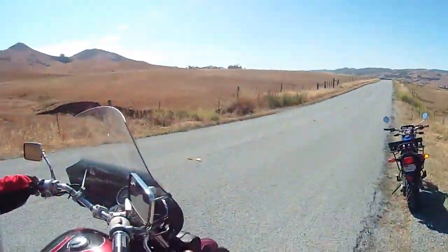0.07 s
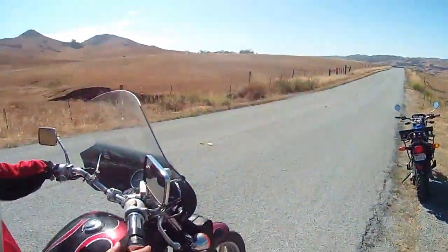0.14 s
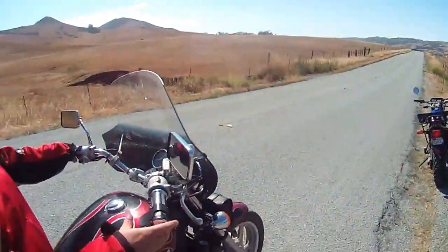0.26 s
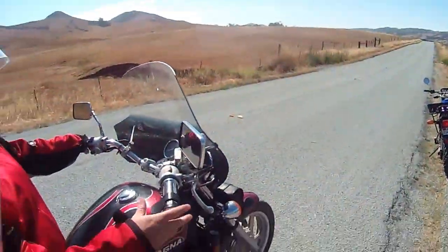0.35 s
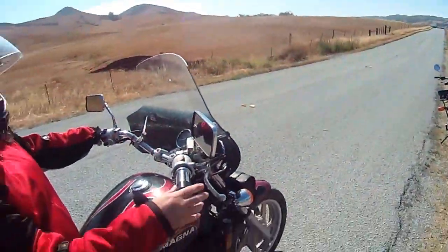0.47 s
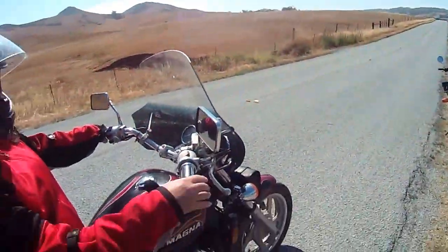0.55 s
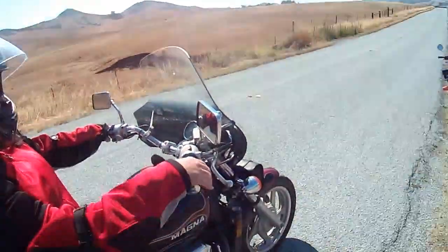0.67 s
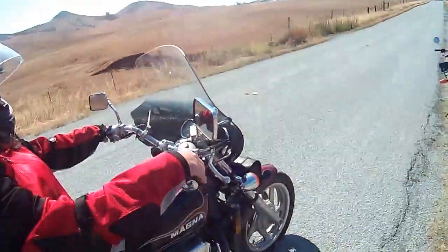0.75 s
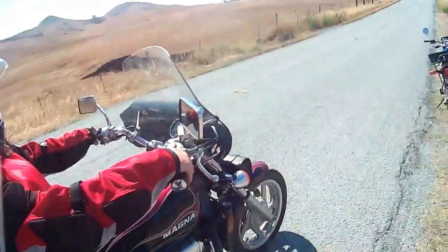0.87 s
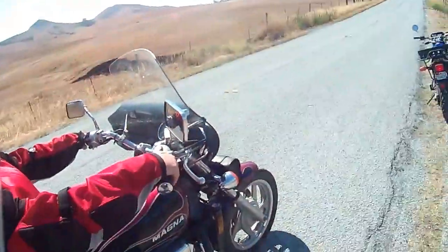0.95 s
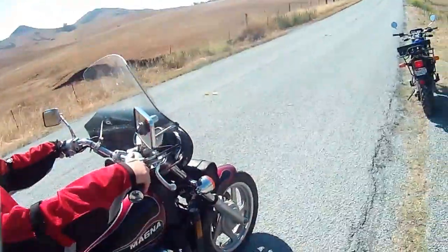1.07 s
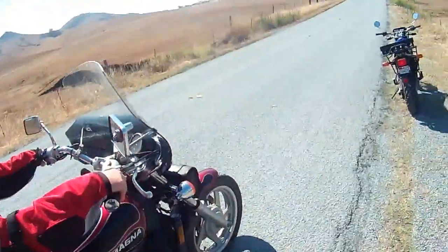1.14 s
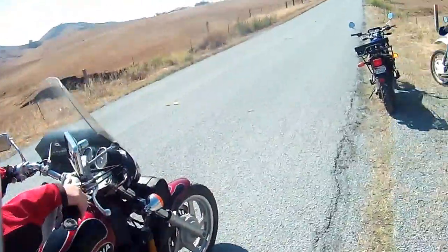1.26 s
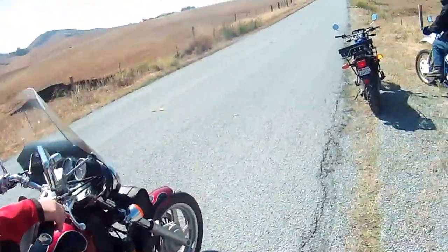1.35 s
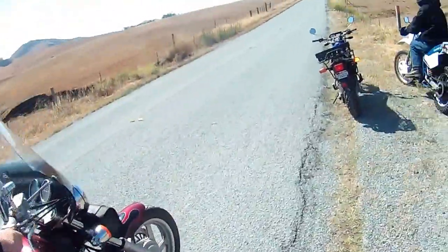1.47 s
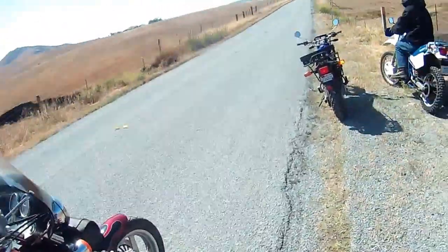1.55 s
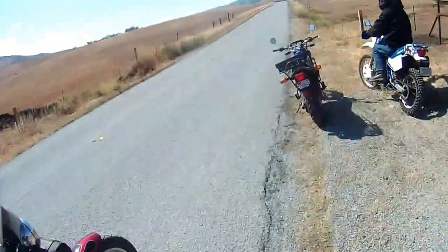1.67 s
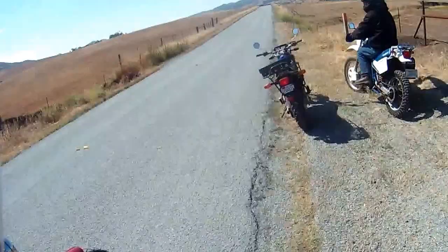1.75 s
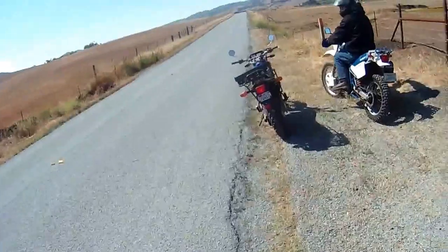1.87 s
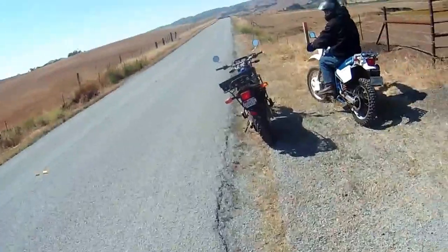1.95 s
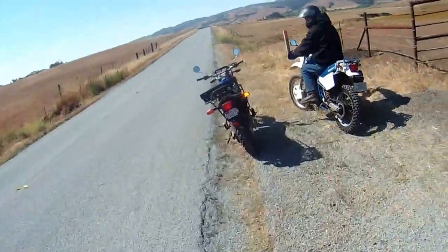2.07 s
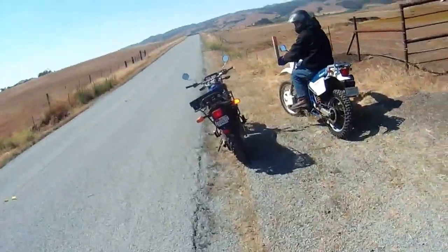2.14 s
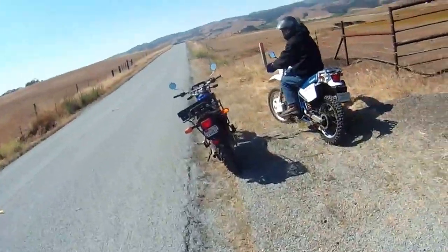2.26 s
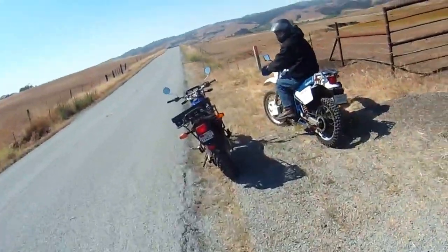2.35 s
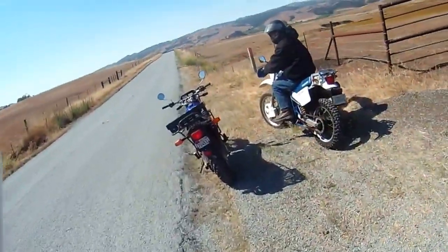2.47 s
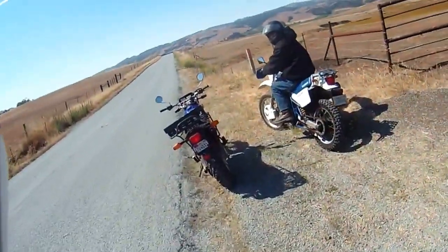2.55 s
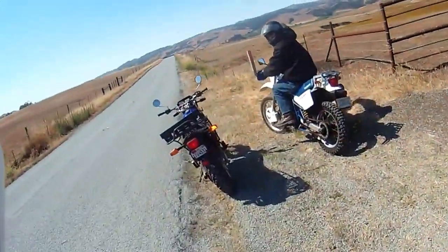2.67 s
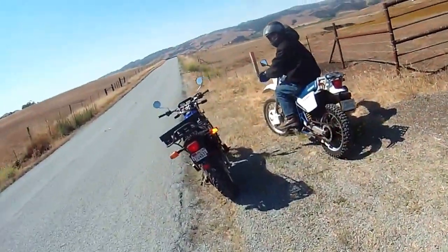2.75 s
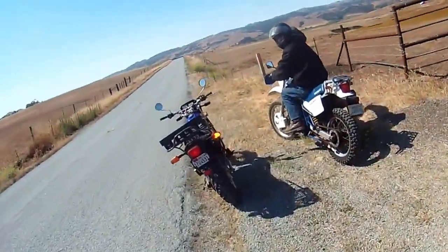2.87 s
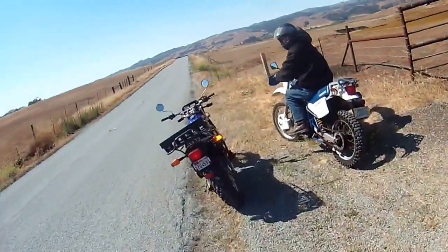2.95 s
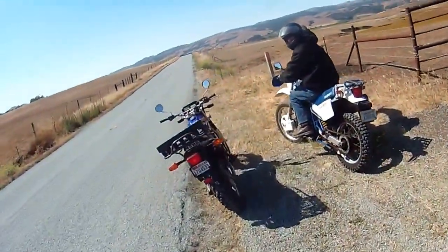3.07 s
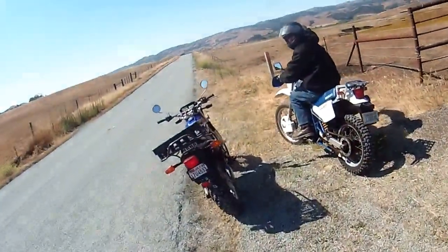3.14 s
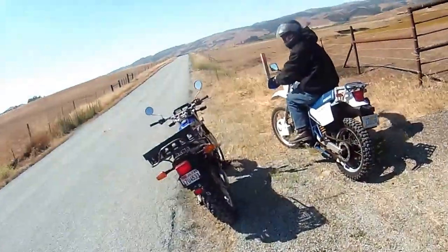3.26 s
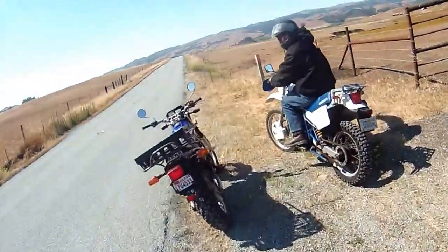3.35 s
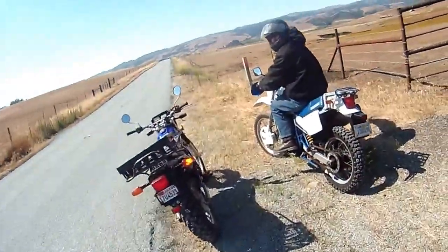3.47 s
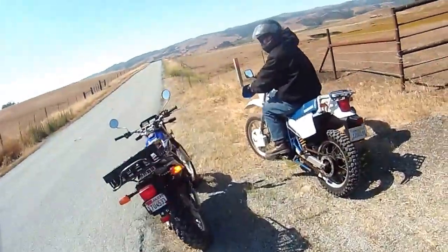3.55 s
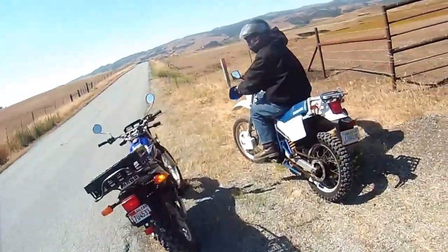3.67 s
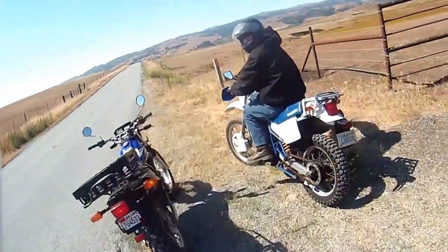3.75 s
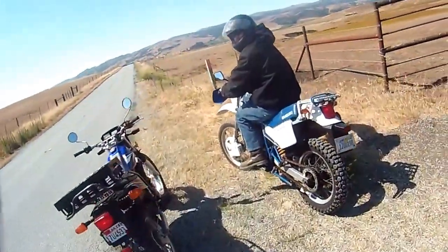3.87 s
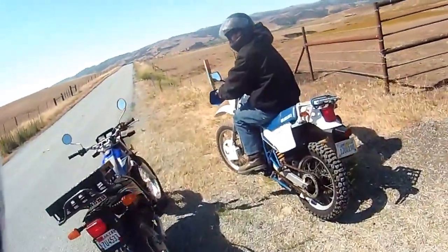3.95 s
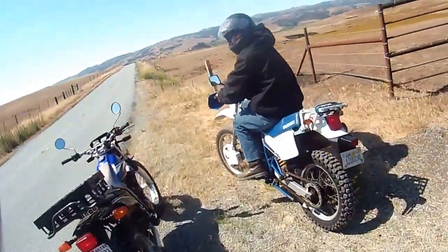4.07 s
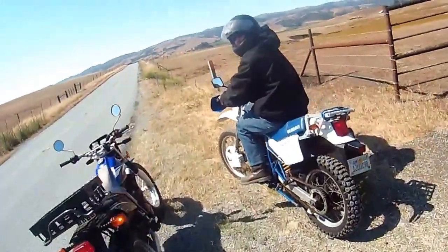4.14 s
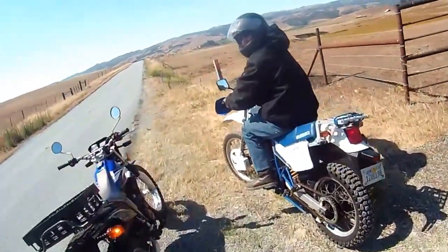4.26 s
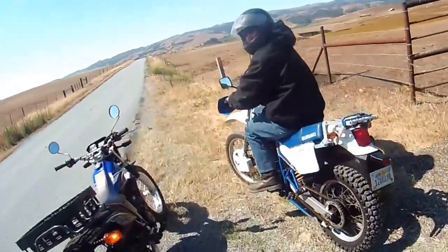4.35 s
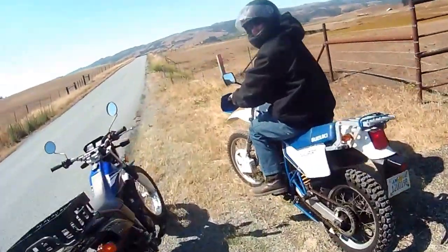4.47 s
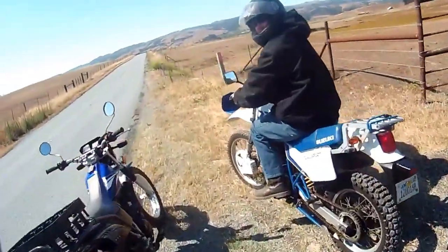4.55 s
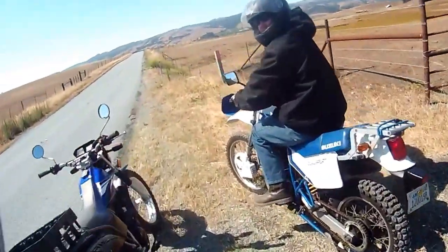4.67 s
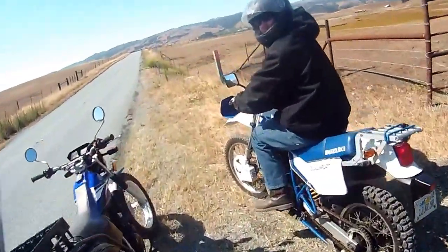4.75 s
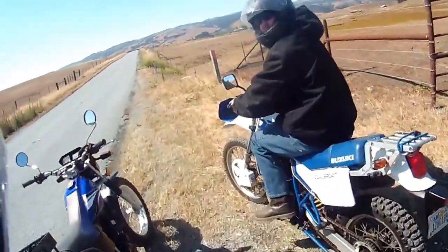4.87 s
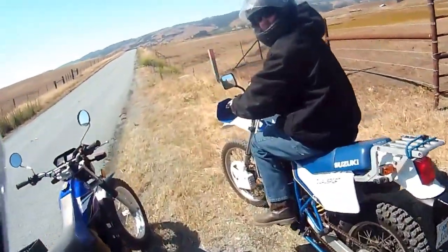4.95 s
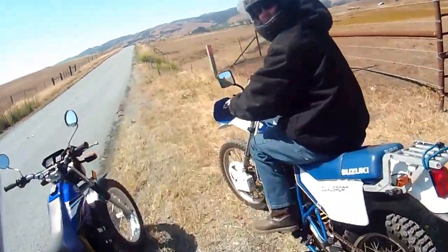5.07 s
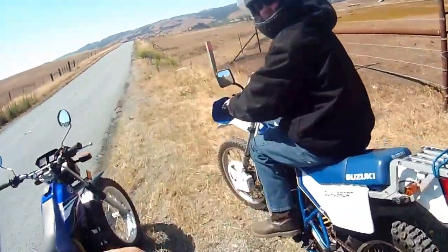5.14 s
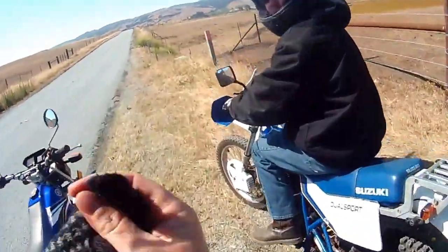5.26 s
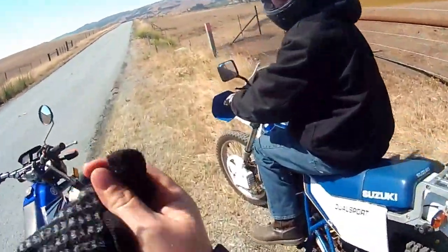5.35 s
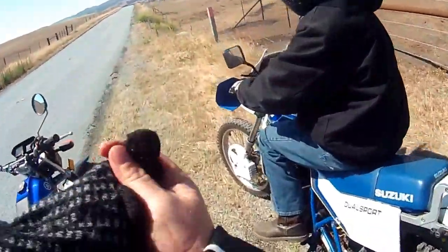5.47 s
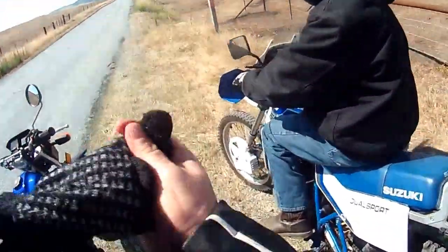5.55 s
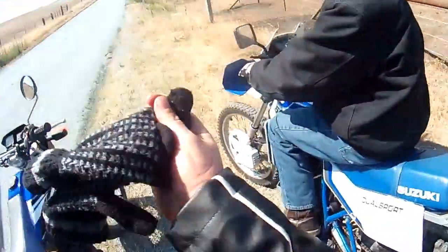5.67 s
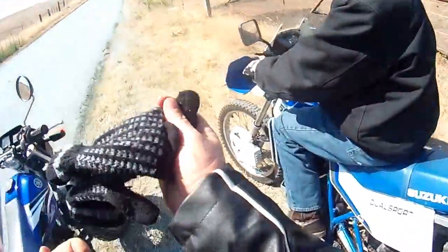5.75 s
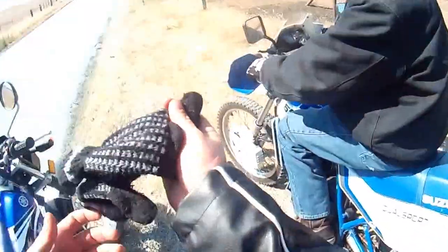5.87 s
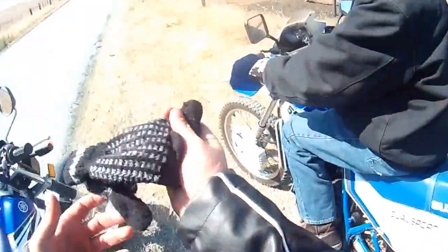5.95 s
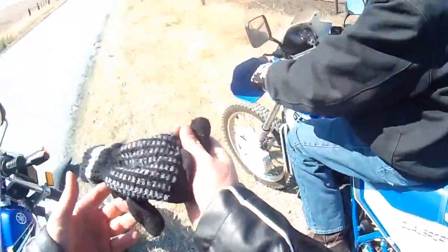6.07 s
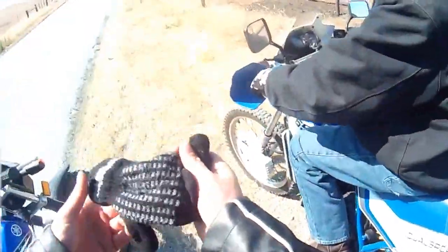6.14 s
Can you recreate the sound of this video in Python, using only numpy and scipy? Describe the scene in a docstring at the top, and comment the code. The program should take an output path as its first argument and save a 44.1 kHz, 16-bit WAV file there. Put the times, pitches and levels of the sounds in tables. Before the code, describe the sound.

A cruiser motorcycle rolls past close by with a small burst of throttle, its low drone and mechanical rasp slowing to an uneven chuffing idle that fades. Two single-cylinder bikes idle out of step at the roadside, one knocking and clattering, the other puffing and hissing, and grow louder as the hand-held microphone approaches. A boot scuffs gravel once, with a few soft microphone bumps and a light breeze in open country without echo.

```python
"""A V-four cruiser rolls past close by, gives a little throttle, then slows to a chuffing idle and fades.
Its uneven firings drone through the muffler while the valve gear rasps. Two singles idle out of step at
the roadside, louder as a hand-held camera nears: a dirt bike knocks and clatters, a slower trail bike
puffs and hisses. A boot scuffs the gravel, the camera takes a few soft bumps and a light breeze blows.
Open country: no reverberation."""
import sys
import numpy as np
from scipy import signal
from scipy.fft import rfft, irfft
from scipy.io import wavfile

SR = 44100
rng = np.random.default_rng(int(sys.argv[2]) if len(sys.argv) > 2 else 0)


def file_out(sig):
    """Save sig as 16-bit WAV at sys.argv[1]."""
    # one column per channel
    cols = np.atleast_2d(sig).T
    # limit, then scale
    lim = np.clip(cols, -1, 1)
    pcm = np.round(lim * 32767).astype(np.int16)
    wavfile.write(sys.argv[1], SR, pcm)


N = 273508
TIME = np.arange(N) / SR

# the cruiser's revs: (time [s], four-stroke cycle rate [Hz])
CRUISER_REVS = [(0, 18.3), (.09, 19.3), (.2, 21.8), (.3, 22.8), (.48, 21.2), (.82, 15.7), (1, 12.8),
                (1.3, 10.6), (6.2, 10.2)]
# the cruiser passes and stops behind the camera: (time [s], exhaust [dB], rasp [dB])
CRUISER_LEVELS = [(0, -55.5, -47), (.2, -52.5, -42.5), (.35, -55.5, -42.5), (.5, -53, -43.5),
                  (.75, -53, -47.5), (.92, -56.5, -49.5), (1.1, -55.5, -51), (1.55, -64.5, -63),
                  (2.1, -65.5, -68), (2.75, -66.5, -72), (3.6, -81.5, -76), (6.2, -78, -80)]
# the dirt bike's idle, hunting a little: (time [s], beat rate [Hz])
DIRT_IDLE = [(1.3, 18.02), (1.6, 17.39), (1.8, 17.91), (2.2, 17.48), (2.6, 17.835), (3.2, 17.655),
             (3.5, 18.19), (3.85, 17.59), (4.05, 18.74), (4.55, 18.75), (4.95, 18.395), (6.2, 18.86)]
# loud engine ticking as the cruiser passes, then the dirt bike growing as the camera nears:
# (time [s], ticking [dB], dirt bike boom [dB], dirt bike bark [dB])
ROADSIDE_LEVELS = [(0, -47.5, -76, -72), (1.5, -59.5, -66, -79.5), (2.45, -63.5, -65.5, -87),
                   (3.1, -59.5, -65.5, -78), (3.7, -56, -67.5, -70), (4.6, -54, -68.5, -65),
                   (5.15, -52.5, -66, -63.5), (5.65, -53.5, -67, -63), (6.2, -53.5, -66, -64.5)]
# the idling bikes' treble glances off the ground, by a shifting path: (time [s], lag [s])
IDLER_LAG = [(1.6, .00053), (2.2, .000485), (3.2, .000483), (4.3, .00042), (5.3, .0004)]
IDLER_ECHO = .33  # gain of that bounce
DIRT_ON_BEAT_S = 1.337


def cruiser_exhaust(boom_db=0.5, boom_hz=89, muffler_hz=250, cut_hz=62, roughness=.07, break_up=0.076,
                    chuff_db=-27.5, chuff_growth=1.8):
    """Four uneven firings a cycle drone through a muffler and break up into chuffs as the revs fall."""
    # a touch of throttle: (time [s], opening [0-1], bark of the upper orders [dB])
    throttle = [(0, 1, -29), (.2, 0.9, -28), (.29, 0.65, -15), (.345, 0.03, -17), (.45, 0, -39)]
    # the exhaust note: (order [multiple of the cycle rate], throttle open [dB], throttle shut [dB])
    orders = [(2, -10, -11), (3, -22, -19), (4, -1, 2.5), (5, -21, -20), (6, -8, 1), (7, -18, -11),
              (8, -4, 2), (9, -22, -8), (10, -0.5, -8), (11, -39, -7), (12, -3, -16), (13, -22, -9.5),
              (14, -6, -16), (16, -12, -11.5)]
    cycle_hz, turns, ragged = cruiser_crank()
    opening, bark_db = curves(throttle)
    exhaust_db, _ = curves(CRUISER_LEVELS)
    note, power = 0, 0
    for k, open_db, shut_db in orders:
        hz = k * cycle_hz
        db = shut_db + (open_db - shut_db) * opening + boom_db / (1 + ((hz - boom_hz) / 9) ** 2)
        height = amp(db) / np.sqrt((1 + (hz / muffler_hz) ** 10) * (1 + (cut_hz / hz) ** 6))
        wobble = 1 + roughness * ragged * drift(3.1)
        note += height * wobble * np.cos(2 * np.pi * (k * turns + rng.random()))
        power += height ** 2 / 2
    drone = note / np.sqrt(power) / (1 + break_up * (ragged - 1) ** 2)
    bark = unit(sum(np.cos(2 * np.pi * (k * turns + rng.random())) / k for k in (24, 28, 32, 36)))
    strokes = [(s, 1.1 * rng.standard_normal()) for s in TIME[np.flatnonzero(np.diff(np.floor(2 * turns)))]]
    # dark, throaty gas: (frequency [Hz], level [dB])
    gas_colour = [(25, -19), (80, -8.5), (130, 0), (190, 5.5), (290, -29.5), (550, -15.5), (900, -45.5)]
    gas = colour(rng.standard_normal(N), gas_colour)
    burble = unit(puffs(gas, strokes, rise_s=0.0067, fall_s=0.02, between=0.12, lead_s=0))
    chuffs = amp(chuff_db) * burble * ragged ** chuff_growth
    return amp(exhaust_db) * (drone + amp(bark_db) * bark + chuffs)


def cruiser_gears(throb=.3, case_db=-3, whirr_db=-44, pass_s=0.36, pass_width_s=0.061):
    """Valve gear rasps in step with the crank and rings the crankcase; the gearcase whirrs going by."""
    # the gritty rasp: (frequency [Hz], level [dB])
    rasp_colour = [(180, -45), (300, -38), (397, -35), (439, -26), (808, -27), (1260, -4), (1490, -14.5),
                   (1640, 5), (2650, -8), (3070, -7.5), (4000, -14.5), (4350, -16.5), (6570, -21.5),
                   (7620, -28), (15500, -49.5)]
    # crankcase and gearcase resonances: (frequency [Hz], width [Hz], level [dB])
    crankcase_modes = [(1230, 100, 4.5), (1641, 49, 15.5), (1626, 150, -9.5), (2030, 20, -11),
                       (2650, 11, 7), (2980, 6, -2.5), (4330, 106, -1.5), (4980, 20, -11.5), (6460, 48, -3),
                       (6450, 80, -15.5), (9030, 100, -18)]
    gearcase_modes = [(1834, 160, 0)]
    # the treble's bounce off the ground: (time [s], lag [s])
    ground_lag = [(0, .00044), (1, .00045), (1.7, .000475)]
    _, turns, ragged = cruiser_crank()
    _, rasp_db = curves(CRUISER_LEVELS)
    load = unit(1 + throb / np.sqrt(ragged) * np.cos(2 * np.pi * (2 * turns - .2)))
    ticks = grains(14000, .6) * load
    rasp = colour(ticks, rasp_colour) + amp(case_db) * highpass(ring(ticks, crankcase_modes), 1360)
    rasp = unit(over_ground(rasp, ground_lag, echo=0.23))
    whirr = unit(ring(ring(ticks, gearcase_modes), gearcase_modes))
    passing = np.exp(-((TIME - pass_s) / pass_width_s) ** 2)
    return amp(rasp_db) * rasp + amp(whirr_db) * whirr * passing


def cruiser_pops():
    """The exhaust pops as the throttle eases."""
    # (time [s], level [dB], pitch [Hz], length [cycles])
    pops = [(.207, -44.5, 165, 1.4), (.335, -44, 115, 0.84), (.428, -43, 128, 1.5), (.85, -49.5, 90, 1.6),
            (1.01, -50, 105, 0.67)]
    return thuds(pops)


def cruiser_crank():
    """Cycle rate, cycles run, and how ragged the combustion grows as the revs fall (1 at top revs)."""
    cycle_hz, = curves(CRUISER_REVS)
    return cycle_hz, np.cumsum(cycle_hz) / SR, (cycle_hz.max() / cycle_hz) ** 2


def dirt_bike_exhaust(blowdown_s=0.00421):
    """Each beat, a pressure pulse barks at the outlet; turbulent gas follows and booms in the silencer."""
    # silencer and outlet resonances: (frequency [Hz], width [Hz], level [dB])
    silencer_modes = [(86.6, 39, 1), (181.5, 68, -5), (303, 72, -13.5)]
    outlet_modes = [(245, 57, 4)]
    _, boom_db, bark_db = curves(ROADSIDE_LEVELS)
    strokes = beats(crank(DIRT_IDLE, DIRT_ON_BEAT_S), np.zeros(N), scatter_db=-0.5)
    flow = puffs(lowpass(rng.standard_normal(N), 880), strokes)
    boom = unit(lowpass(ring(flow, silencer_modes), 690))
    blowdown = unit(ring(pulses(strokes, blowdown_s), outlet_modes))
    bark = unit(ring(blowdown + .5 * unit(ring(flow, outlet_modes)), outlet_modes))
    return amp(boom_db) * boom + amp(bark_db) * bark


def dirt_bike_knocks(body_db=-10, edge_db=7, light_edge_db=-14, decay_s=0.0013, rebound_s=0.0084,
                     rebound_db=-7, rattle_db=-23, rattle_s=0.034, ring_db=-5):
    """Slack metal parts slap at each beat, now and then hard, rebound once and ring the casing."""
    # the light knocking comes and goes: (time [s], level [dB])
    light_level = [(1.2, -62), (1.7, -47), (2.3, -44), (3.55, -44.5), (4.4, -43), (4.75, -60), (5.2, -69),
                   (6.2, -46)]
    # hard knocks, each taking over the nearest beat: (time [s], body [dB], edge [dB])
    hard_knocks = [(1.45, -33, -60), (1.5634, -34, -52), (1.6777, -33.5, -57), (1.734, -32, -53),
                   (1.79, -37, -56), (1.845, -38, -55), (2.072, -39, -51), (2.1852, -43, -57.5),
                   (2.299, -47, -53.5), (2.4132, -44, -51.5), (2.4695, -45, -54.5), (2.581, -44, -54),
                   (2.6394, -54, -55), (2.695, -44, -59), (2.7509, -37, -54.5), (2.808, -36, -53),
                   (2.863, -34, -51.5), (2.9747, -38, -49.5), (3.0883, -35, -49.5), (3.1446, -35, -51.5),
                   (3.202, -41, -51), (3.426, -34, -56), (3.535, -35.5, -54), (3.649, -44, -55),
                   (3.7033, -29.5, -51), (3.7594, -42, -53), (3.874, -35, -53.5), (3.9834, -31, -51),
                   (4.0369, -31.5, -53.5), (4.0893, -40, -47.5), (4.1973, -33.5, -50),
                   (4.304, -35.5, -45.5), (4.3577, -45, -55), (4.4098, -30, -48.5), (4.463, -36, -50.5),
                   (4.5189, -32, -49.5), (4.623, -33.5, -51), (4.785, -41, -65), (4.895, -29.5, -60),
                   (5.002, -33.5, -52), (5.598, -30, -64)]
    # a knock's dull body and bright edge: (frequency [Hz], level [dB])
    body_colour = [(300, -11.5), (850, -28), (1100, -10), (1700, 2), (2200, -6.5), (3000, -29.5),
                   (14000, -46)]
    edge_colour = [(1200, -31.5), (2300, 7.5), (3100, 0.5), (3950, -3.5), (4600, -7), (6000, -27),
                   (8000, -15), (14000, -40)]
    # casing resonances: (frequency [Hz], width [Hz], level [dB])
    casing_modes = [(1633, 57, 7.5), (2440, 41, -2), (2834, 17, 6.5), (2960, 140, -16), (4160, 82, -1.5),
                    (4700, 73, -16), (6950, 130, -16)]
    t, body, edge = TIME[:SR // 20], np.zeros(N), np.zeros(N)
    turns = crank(DIRT_IDLE, DIRT_ON_BEAT_S)
    light = beats(turns, curves(light_level)[0], scatter_db=3.5, alternate_db=1.5)
    blows = np.column_stack([light, light[:, 1] + light_edge_db])
    for row in hard_knocks:
        blows[np.argmin(abs(blows[:, 0] - row[0]))] = row
    strike = 2 * np.exp(-t / decay_s) * (1 - np.exp(-t / 0.0011))
    push = np.linalg.norm(strike) * signal.unit_impulse(len(t), SR // 1000)
    for s, dull_db, bright_db in blows:
        slap, rebound, rattle = rng.choice([-1, 1], (3, len(t)))
        hit = slap * strike + amp(rattle_db) * rattle * np.exp(-t / rattle_s)
        add(hit, rebound_s + .0008 * rng.standard_normal(), amp(rebound_db) * rebound * strike)
        add(body, s, amp(dull_db) * (hit + push))
        add(edge, s, amp(bright_db) * hit)
    casing = colour(edge, edge_colour) + amp(ring_db) * highpass(ring(edge, casing_modes), 630)
    return amp(body_db) * colour(body, body_colour) + amp(edge_db) * lowpass(casing, 7600, order=2)


def engine_clatter(tick_trim_db=-5, throb=0.1, flutter_db=1.1):
    """Cam chain and tappets tick and ring the cooling fins; a thin metallic ring hangs near 3 kHz."""
    # the dry ticking: (frequency [Hz], level [dB])
    tick_colour = [(400, -22.5), (850, -27.5), (1050, -13), (1450, -19.5), (1720, 0), (2000, -10.5),
                   (2260, -14.5), (3100, -22.5), (3800, -21), (4600, -17.5), (5900, -27.5), (7600, -26),
                   (11000, -39.5), (15500, -49)]
    # resonances of the fins and of the thin ring: (frequency [Hz], width [Hz], level [dB])
    fin_modes = [(1314, 67, -4.5), (1529, 11.2, 11.5), (1669, 13.4, 9.5), (1725, 18.3, 8.5), (1820, 41, 2),
                 (1953, 22, 5.5), (2106, 73, -7.5), (2494, 30, -10), (3010, 20, -4)]
    thin_modes = [(2510, 100, -1.5), (2794, 87, -8), (2888, 40, 0), (3100, 69, -1)]
    # the fins swell as the dirt bike's cylinder comes into view: (time [s], level [dB])
    fin_level = [(0, -60), (1.4, -60), (2.1, -67), (2.6, -63), (3.7, -59), (4.5, -58.5), (4.9, -55),
                 (5.3, -52.5), (5.7, -51), (6.2, -54.5)]
    # the thin ring comes and goes over the idling engines: (time [s], level [dB])
    thin_level = [(1.3, -87), (1.85, -70.5), (2.6, -67), (3.1, -69.5), (3.8, -72), (4.6, -68.5), (6.2, -67)]
    tick_db, fin_db, thin_db = (curves(rows)[0] for rows in (ROADSIDE_LEVELS, fin_level, thin_level))
    turns = crank(DIRT_IDLE, DIRT_ON_BEAT_S)
    force = (1 + throb * np.cos(2 * np.pi * turns)) * amp(flutter_db * drift(72))
    ticks = colour(unit(force * grains(6000, 2.7)), tick_colour)
    ticks = over_ground(ticks, IDLER_LAG, IDLER_ECHO)
    fins = lowpass(highpass(ring(force * grains(2500, 1), fin_modes), 1360), 2670)
    fins = unit(waver(fins, share=0.001487, hz=1.19))
    thin_ring = unit(highpass(ring(force * grains(2500, 1), thin_modes), 2100))
    return amp(tick_db + tick_trim_db) * ticks + amp(fin_db) * fins + amp(thin_db) * thin_ring


def trail_bike(on_beat_s=5.118, blowdown_s=0.00705, turbulence=0.37):
    """A slower single drifts in and out of step: each stroke booms in the pipe, rings its tail, hisses."""
    # its lazy idle: (time [s], beat rate [Hz])
    idle = [(0, 16.05), (1.3, 16.05), (1.8, 15.85), (2.6, 15.97), (4, 15.95), (4.45, 15.55), (4.95, 15.95)]
    # the balance as the camera walks up: (time [s], boom [dB], tail ring [dB], hiss [dB])
    levels = [(0, -72, -78.5, -66), (1.6, -64.5, -77, -78), (2.5, -64, -75.5, -75),
              (3.1, -65.5, -69, -74.5), (3.8, -62.5, -68, -70), (4.6, -66, -67.5, -71),
              (5.4, -62, -70, -68), (6.2, -61, -67.5, -74.5)]
    # pipe and tailpipe resonances: (frequency [Hz], width [Hz], level [dB])
    pipe_modes = [(68.3, 23, 4.5), (95.5, 32, 1), (128.6, 12.7, 7.5), (197, 45, -12.5), (490, 27, -12),
                  (557, 28, -19.5), (637, 53, -15.5)]
    tail_modes = [(367.3, 39, 0)]
    # the hiss of each stroke: (frequency [Hz], level [dB])
    hiss_colour = [(380, -15), (560, -3), (850, -7.5), (2600, 6), (3900, -7.5), (4800, 2.5), (6000, -7.5),
                   (7600, -5.5), (10500, -16.5), (15000, -25)]
    boom_db, tail_db, hiss_db = curves(levels)
    strokes = beats(crank(idle, on_beat_s), np.zeros(N), scatter_db=1.18)
    gas = lowpass(rng.standard_normal(N), 775)
    flow = puffs(gas, strokes, rise_s=0.012, fall_s=0.011, between=0.18, lead_s=0.00911)
    boom = unit(lowpass(ring(flow, pipe_modes), 740))
    blowdown = unit(ring(pulses(strokes, blowdown_s), tail_modes))
    tail = unit(ring(blowdown + turbulence * unit(ring(flow, tail_modes)), tail_modes))
    hiss = puffs(grains(9000, 1.5), strokes, rise_s=.008, fall_s=.01, between=.05, lead_s=.0009)
    hiss = over_ground(unit(colour(hiss, hiss_colour)), IDLER_LAG, IDLER_ECHO)
    return amp(boom_db) * boom + amp(tail_db) * tail + amp(hiss_db) * hiss


def boot(grind_trim_db=1):
    """Stones grind underfoot in a quick run of slips; one gives with a sharp crack."""
    # (time [s], grind [dB], crack [dB], decay [s])
    slips = [(3.297, -49, -68, 0.0043), (3.3148, -47.5, -59, 0.0045), (3.331, -49, -57, 0.0049),
             (3.345, -45.5, -46.5, 0.0039), (3.358, -49, -59, 0.0048), (3.368, -44.5, -70, 0.0061),
             (3.383, -55.5, -67, 0.095)]
    # crunching gravel and cracking stone: (frequency [Hz], level [dB])
    gravel_colour = [(120, -5), (250, 4), (750, -20), (1600, 6.5), (2500, -2), (3900, -12), (4500, -1.5),
                     (5600, -29), (8000, -28), (15000, -33)]
    crack_colour = [(1500, -7), (3000, -3), (4500, 8.5), (5700, 1), (7500, 0), (10000, -15), (15000, -16)]
    force, snap, t = np.zeros(N), np.zeros(N), TIME[:SR // 3]
    for s, grind_db, crack_db, decay_s in slips:
        add(force, s, amp(grind_db) * np.exp(-t / decay_s))
        add(snap, s, amp(crack_db) * np.exp(-t / decay_s))
    grind = colour(force * grains(9200, 1.6), gravel_colour)
    crack = colour(snap * grains(8000, 2.8), crack_colour)
    return amp(grind_trim_db) * grind + crack


def camera_bumps():
    """Soft bumps thud through the camera body; the first, at 1.19 s, is a last pop from the cruiser's exhaust
    as its revs fall."""
    # (time [s], level [dB], pitch [Hz], length [cycles])
    bumps = [(1.188, -48, 166, 0.68), (2.586, -51, 66, 1.5), (2.705, -38.5, 171, 0.36),
             (2.772, -45.5, 224, 0.37), (3.947, -54.5, 234, 3.4), (3.972, -42, 150, 0.35),
             (5.55, -41, 170, 0.21), (5.573, -52, 62, 3)]
    return thuds(bumps)


def air(level_db=-65, gust_db=2):
    """A bed of light breeze and distant engine rumble."""
    # (frequency [Hz], level [dB])
    air_colour = [(15, 3.5), (45, 1), (90, -8.5), (180, -6.5), (300, -7), (750, -23.5), (1600, -3.5),
                  (3000, -21.5), (8000, -31.5), (15000, -48)]
    breeze = colour(rng.standard_normal(N), air_colour) * amp(gust_db * drift(6.8))
    return amp(level_db) * unit(breeze)


def camera_whine(hz=15176, level_db=-93, flutter_hz=58):
    """The camera's electronics give off a thin, fluttering whine."""
    flutter = 1 + 0.47 * np.cos(2 * np.pi * flutter_hz * TIME)
    return amp(level_db) * np.sqrt(2) * np.sin(2 * np.pi * hz * TIME) * flutter


def crank(idle, on_beat_s):
    """Turns of an idling crank, a whole number at each beat."""
    turns = np.cumsum(curves(idle)[0]) / SR
    return turns - np.interp(on_beat_s, TIME, turns)


def beats(turns, level_db, scatter_db, alternate_db=0):
    """One row (time [s], level [dB]) a turn, each a little uneven, optionally weak and strong in turn."""
    turn = np.floor(turns)
    at = np.flatnonzero(np.diff(turn)) + 1
    db = level_db[at] - alternate_db * np.cos(np.pi * turn[at]) + scatter_db * rng.standard_normal(len(at))
    return np.column_stack([TIME[at], db])


def puffs(gas, strokes, rise_s=0.011, fall_s=0.023, between=0.21, lead_s=0.00096):
    """Chops a stream of gas into one puff a beat."""
    t, flow = np.arange(-SR // 25, SR // 20) / SR, np.zeros(N)
    swell = np.exp(-(t / np.where(t < 0, rise_s, fall_s)) ** 2)
    shape = (between + swell) * signal.windows.tukey(len(t), .5)
    for s, db in strokes:
        stream = np.take(gas, round(s * SR) + np.arange(len(t)), mode="wrap")
        add(flow, s + t[0] - lead_s, amp(db) * unit(shape * stream))
    return flow


def pulses(strokes, lead_s):
    """One pressure pulse just ahead of each beat."""
    push = np.zeros(N)
    for s, db in strokes:
        add(push, s - lead_s, amp([db]))
    return push


def thuds(rows):
    """Short dull pushes of air, each a low tone under a bell-shaped envelope."""
    out, t = np.zeros(N), np.arange(-SR // 16, SR // 16) / SR
    for s, db, hz, cycles in rows:
        add(out, s + t[0], amp(db) * np.cos(2 * np.pi * hz * t) * np.exp(-(hz * t / cycles) ** 2))
    return out


def grains(per_s, spread_db):
    """A random train of tiny impacts of uneven size, rms 1."""
    size = amp(spread_db * np.minimum(rng.exponential(1, N), 3))
    return unit(size * rng.choice([-1, 1], N) * (rng.random(N) < per_s / SR))


def over_ground(x, lags, echo, above_hz=4700):
    """Adds the treble's reflection off the ground, whose lag changes as things move."""
    lag_s, = curves(lags)
    treble = signal.sosfiltfilt(signal.butter(3, above_hz, "high", fs=SR, output="sos"), x)
    return x + echo * np.interp(TIME - lag_s, TIME, treble)


def ring(x, modes):
    """Rings a set of damped modes, neighbours in opposite phase, with energy 1."""
    t = TIME[:SR // 4]
    taps = sum((-1) ** k * amp(db) * width * np.exp(-np.pi * width * t) * np.cos(2 * np.pi * hz * t)
               for k, (hz, width, db) in enumerate(modes))
    return signal.oaconvolve(x, taps / np.linalg.norm(taps))[:N]


def colour(x, points, size=4096):
    """Minimum-phase EQ of energy 1 with the given spectrum."""
    hz, db = np.transpose(points)
    log_hz = np.log(abs(np.fft.fftfreq(size, 1 / SR)) + 1)
    log_gain = np.log(amp(np.interp(log_hz, np.log(hz), db)))
    taps = np.fft.ifft(np.exp(np.conj(signal.hilbert(log_gain)))).real[:size // 2]
    return signal.oaconvolve(x, taps / np.linalg.norm(taps))[:N]


def lowpass(x, hz, order=4):
    """Rolls off above a corner."""
    return signal.sosfilt(signal.butter(order, hz, fs=SR, output="sos"), x)


def highpass(x, hz):
    """Rolls off below a corner."""
    return signal.sosfilt(signal.butter(4, hz, "high", fs=SR, output="sos"), x)


def waver(x, share, hz):
    """Lets the pitch wander slowly by a small share."""
    return np.interp(TIME + share * np.cumsum(drift(hz)) / SR, TIME, x)


def drift(hz):
    """A random wander of rms 1, up to a rate."""
    f = np.fft.rfftfreq(N, 1 / SR)
    return unit(irfft(rfft(rng.standard_normal(N)) / (1 + (f / hz) ** 4), N))


def curves(rows):
    """Each column of a table, joined by straight lines in time."""
    s, *columns = np.transpose(rows)
    return [np.interp(TIME, s, c) for c in columns]


def add(mix, s, sound):
    """Lays a sound into the mix at a time."""
    part = mix[max(round(s * SR), 0):][:len(sound)]
    part += sound[:len(part)]


def amp(db):
    """Decibels to gain."""
    return 10 ** (np.asarray(db) / 20)


def unit(x):
    """Scales to rms 1."""
    return x / np.sqrt(np.mean(x ** 2) + 1e-20)


def scene():
    """Three bikes and the small sounds reach one microphone."""
    cruiser = cruiser_exhaust() + cruiser_gears() + cruiser_pops()
    engines = cruiser + dirt_bike_exhaust() + dirt_bike_knocks() + engine_clatter() + trail_bike()
    mono = engines + boot() + camera_bumps() + air() + camera_whine()
    return np.array([mono, mono])


def record(dry, notch_hz=3980, notch_q=14, depth=0.53, top_hz=15720):
    """The microphone port hollows out one narrow band; the very top is cut off steeply."""
    hollow = signal.lfilter(*signal.iirnotch(notch_hz, notch_q, SR), dry)
    heard = dry + depth * (hollow - dry)
    taps = signal.firwin(511, top_hz, window=("kaiser", 9), fs=SR)
    return signal.oaconvolve(heard, taps[None], "same")


dry = scene()
out = record(dry)
file_out(out)
```